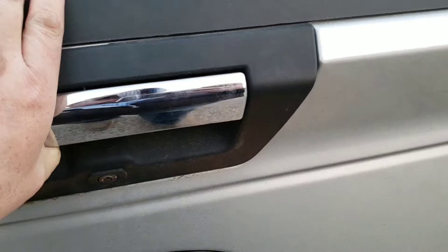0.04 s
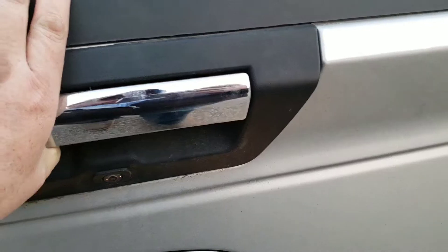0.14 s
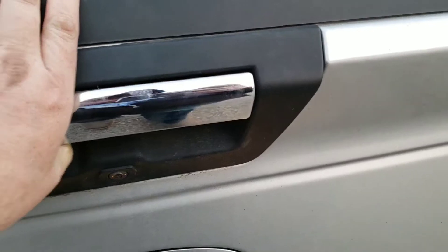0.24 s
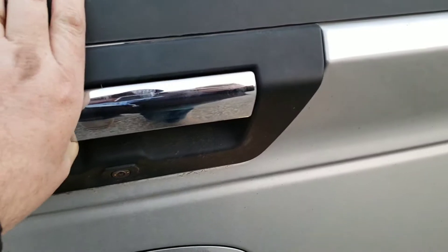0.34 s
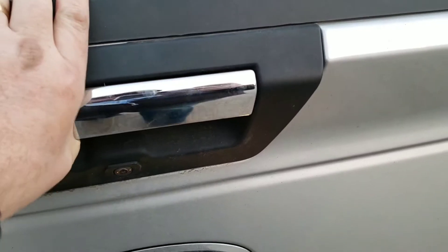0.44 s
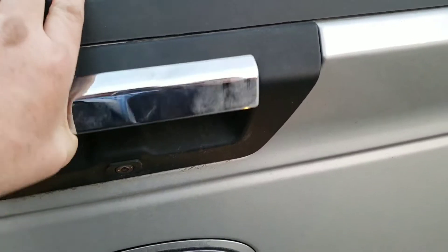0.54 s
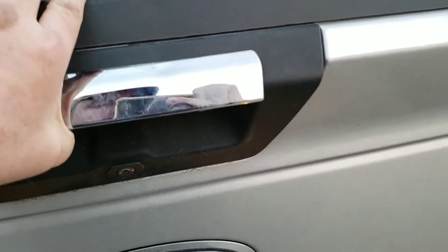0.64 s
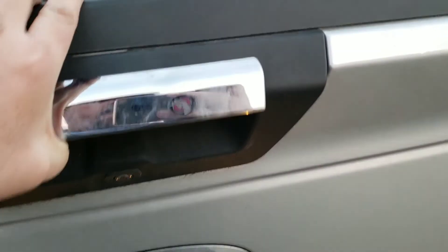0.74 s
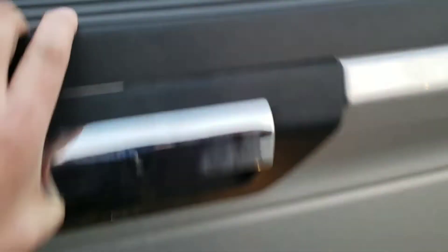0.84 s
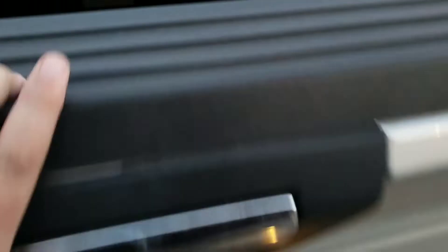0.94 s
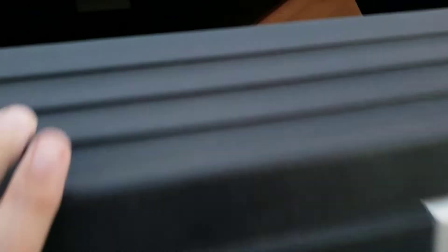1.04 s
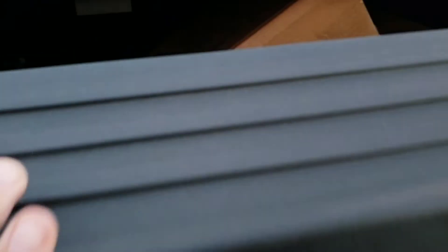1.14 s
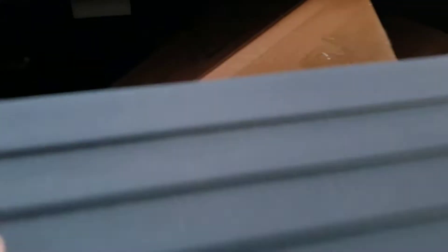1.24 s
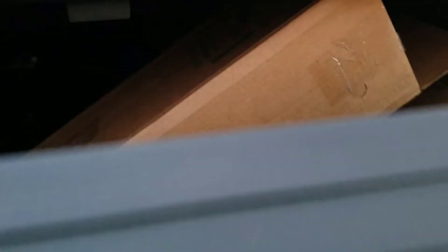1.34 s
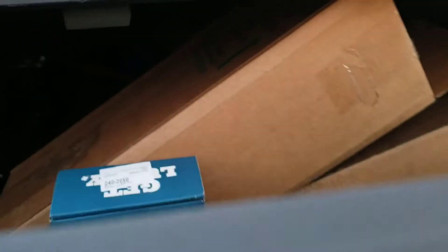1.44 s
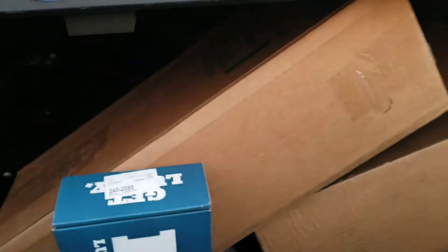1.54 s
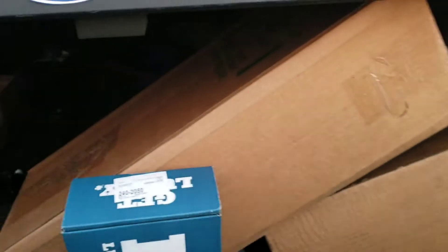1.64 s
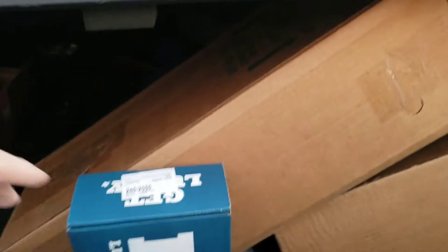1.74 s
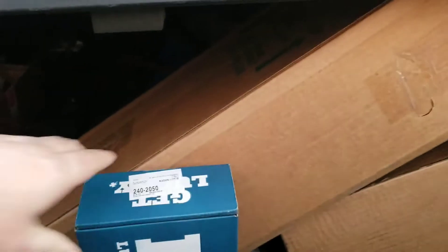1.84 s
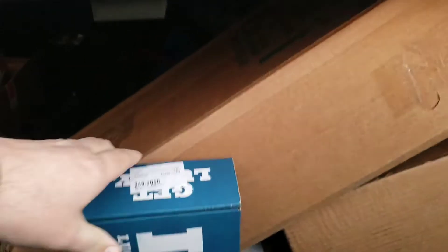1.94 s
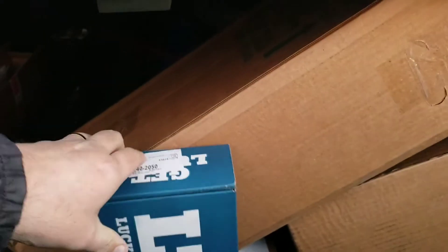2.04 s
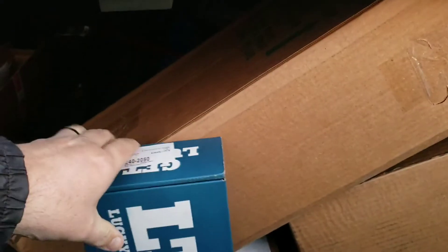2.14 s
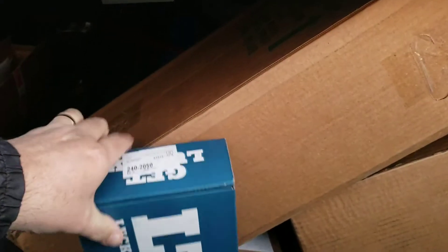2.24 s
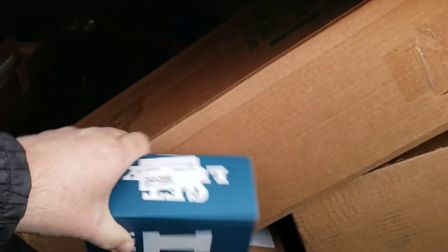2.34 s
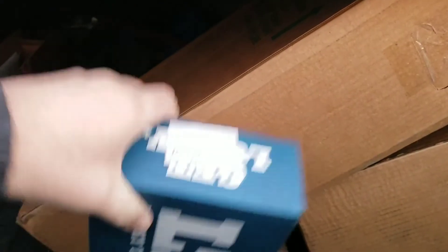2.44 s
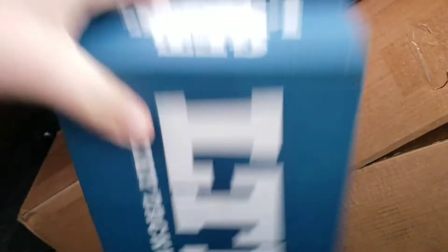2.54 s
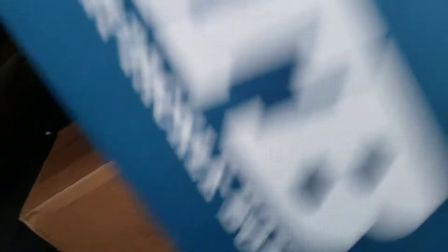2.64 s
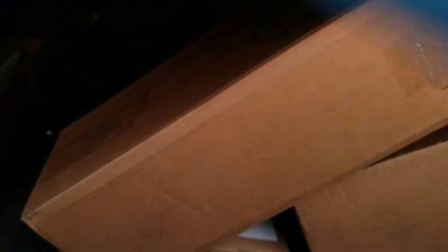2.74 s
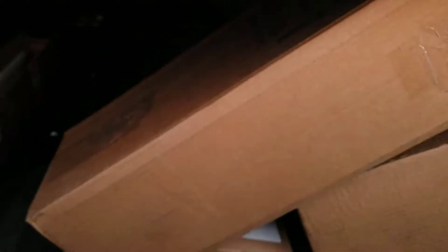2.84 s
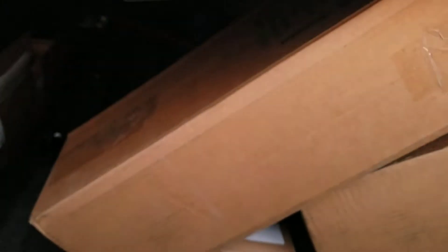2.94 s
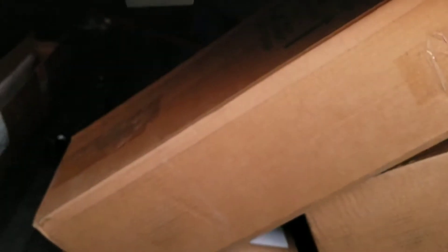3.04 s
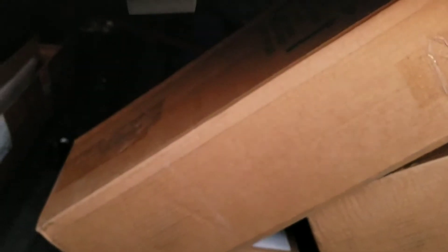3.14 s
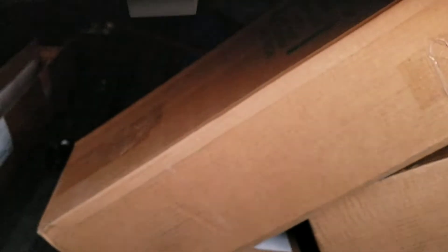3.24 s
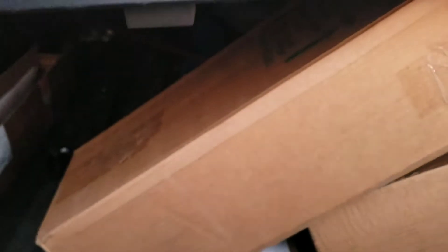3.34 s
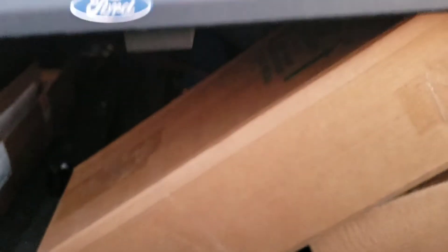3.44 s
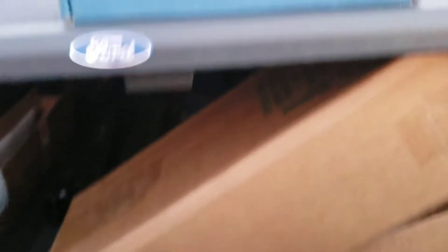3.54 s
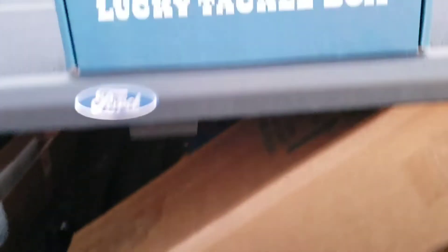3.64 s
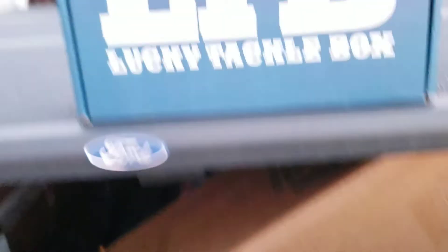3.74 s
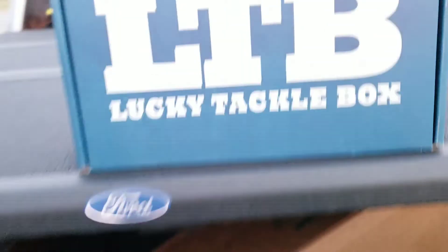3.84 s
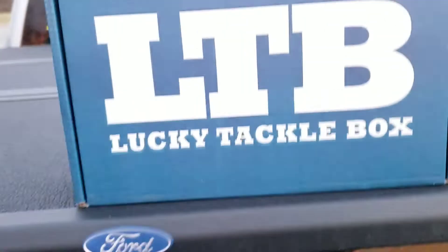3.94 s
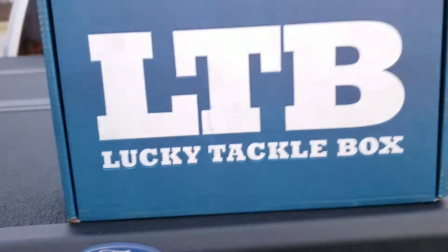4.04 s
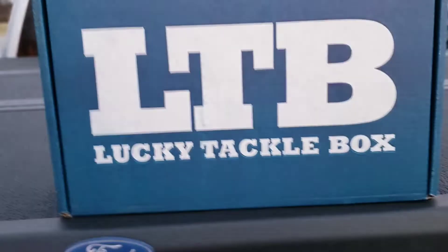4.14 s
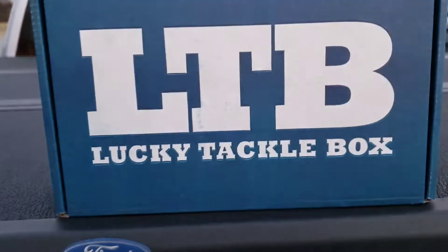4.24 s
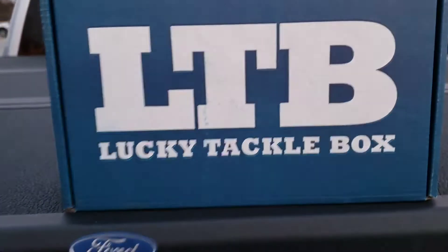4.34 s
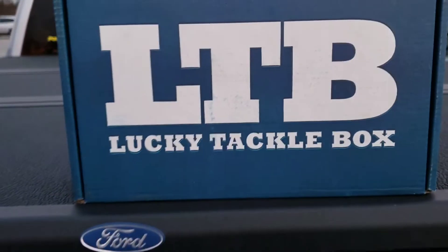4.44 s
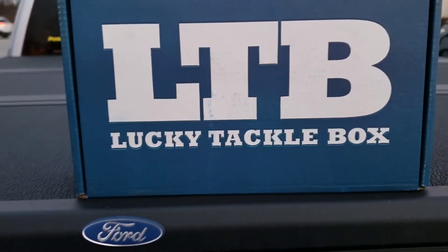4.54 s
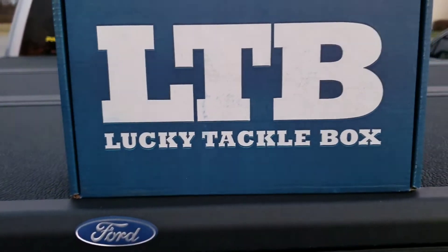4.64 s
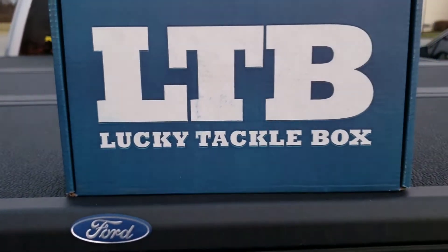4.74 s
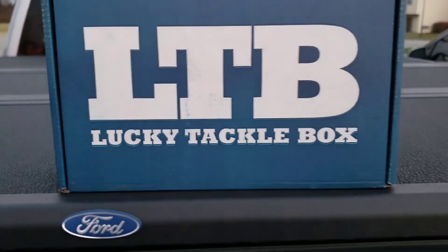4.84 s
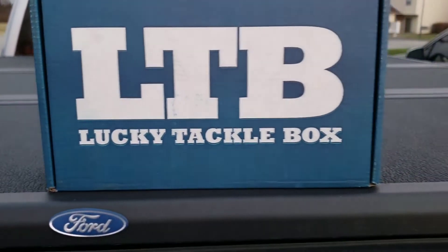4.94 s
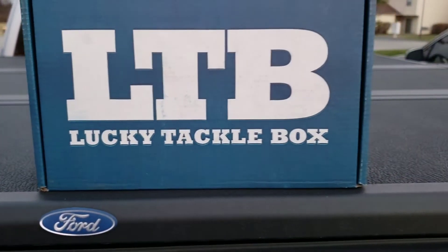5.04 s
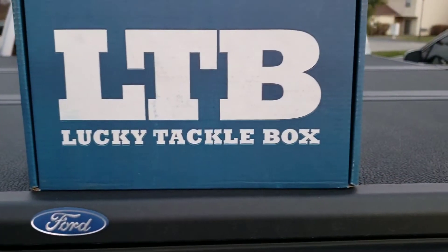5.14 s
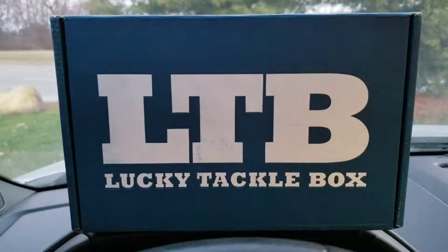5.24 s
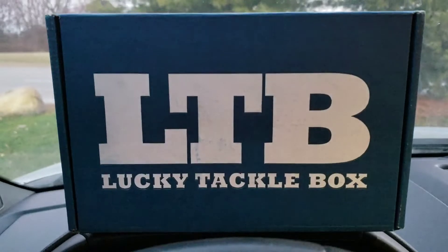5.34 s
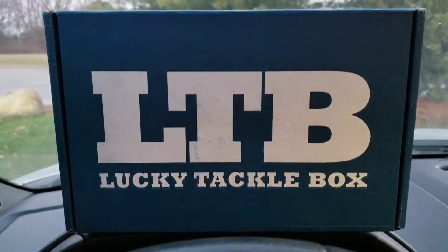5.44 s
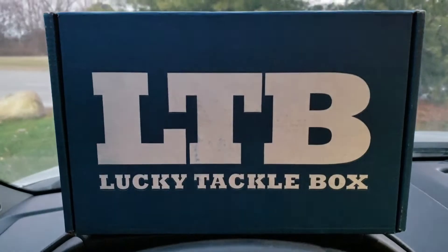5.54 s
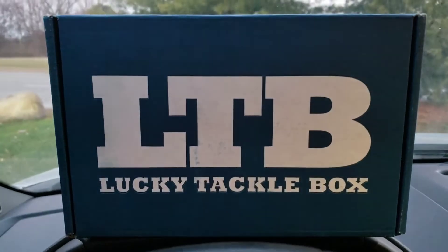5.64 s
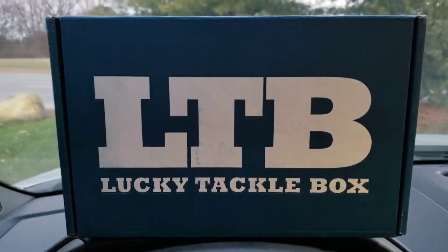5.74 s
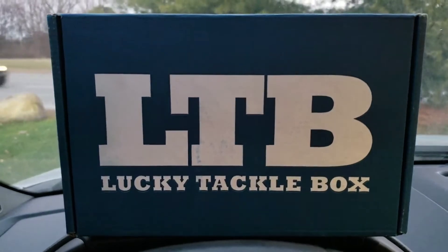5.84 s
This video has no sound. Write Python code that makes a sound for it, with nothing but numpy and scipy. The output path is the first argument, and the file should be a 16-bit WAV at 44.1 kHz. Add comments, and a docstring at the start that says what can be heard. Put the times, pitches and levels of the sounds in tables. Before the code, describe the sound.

A low, slightly wavering engine idle, with rumble and a soft airy whirr, fades in during the first quarter second and continues throughout. Close and slightly left, a plastic handle knocks at about 0.53 to 0.61 s, with little linkage ticks, then squeaks dry and high around 0.65 to 0.75 s; a dull thump follows at 0.88. At 0.96 the latch springs open with a bright clack and short metallic ring. From 1.2 to 3.3 s a nylon sleeve hisses in uneven swishes while hands rub cardboard, fingertips patter near 1.7 and faint creaks scatter. Hollow box knocks cluster at 3.0 to 3.13. At 3.74 the box is set down with a short clack. A faint rising hinge squeak at 3.94 leads to the slam at 4.2 to 4.3: rapid latch clicks, a heavy bassy thud and brief rattle. Then quiet idling, swelling toward the end near 5.9, with barely audible cloth movement.

```python
"""Loading a box into an idling pickup

Close by, slightly left, a plastic handle knocks and squeaks, a latch springs open and at last the door slams.
A jacket sleeve hisses; a cardboard box knocks, creaks, is rubbed and tapped, and is set on the bed cover.
Blows ring decaying sine modes and noise bands; squeaks are jittered tones; rubs and cloth are shaped noise.
Behind it all the engine idles: firing-rate orders, a fan tone, rumble and a resonant whirr.
"""
import sys
import numpy as np
from scipy import signal
from scipy.io import wavfile

SR = 44100
rng = np.random.default_rng(int(sys.argv[2]) if len(sys.argv) > 2 else 0)


def transcribe(u):
    """Save the signal u as a 16-bit wav file named by the first command-line argument.

    u: samples, shape (n,) or (channels, n), limited to [-1, 1]; the rate is SR.
    q: integer samples, one column per channel.
    """
    v = np.clip(np.atleast_2d(u).T, -1, 1)
    q = np.round(v * 32767).astype(np.int16)
    wavfile.write(sys.argv[1], SR, q)


N = 260190
TIME = np.arange(N) / SR
# Half-octave noise bands: edges and centres in Hz
BAND_EDGES = 22 * 2 ** (np.arange(20) / 2)
BAND_HZ = np.sqrt(BAND_EDGES[1:] * BAND_EDGES[:-1])


def from_db(db):
    """Decibels to gain."""
    return 10 ** (np.asarray(db) / 20)


def rms_one(x):
    """Scale to unit power."""
    return x / np.sqrt(np.mean(x ** 2) + 1e-20)


def in_time(rows):
    """Each column of a curve at every sample."""
    s, *columns = np.transpose(rows)
    return [np.interp(TIME, s, column) for column in columns]


def at_hz(points, hz, axis=1):
    """Read one column of a spectrum on a log-frequency axis."""
    points = np.array(points)
    return np.interp(np.log(hz), np.log(points[:, 0]), points[:, axis])


def drift(rate):
    """Smooth chance with spread 1 that takes a new value `rate` times a second."""
    return rms_one(np.interp(TIME * rate, np.arange(N), rng.standard_normal(N)))


def pan(x, left_db):
    """Tip a sound towards the left by a level difference."""
    return x * from_db([[left_db / 2], [-left_db / 2]])


def swell(start, length, attack_s, release_s):
    """A movement builds up, holds to the end of its length and dies away."""
    age = TIME - start
    return np.clip(age / attack_s, 0, 1) * np.exp(-np.clip((age - length) / release_s, 0, 20))


def noise_bands():
    """Half-octave bands of stereo noise, rms 1 each; sound from all sides is alike at both ports only in the bass."""
    port_spacing_m, sound_speed = 0.15, 343  # m, m/s
    white = rng.standard_normal((2, 2, N))
    bands = []
    for k, hz in enumerate(BAND_HZ):
        band_pass = signal.butter(2, BAND_EDGES[k:k + 2], "band", fs=SR, output="sos")
        mid, side = signal.sosfilt(band_pass, white[k % 2])
        alike = 0.96 * np.sinc(2 * hz * port_spacing_m / sound_speed)
        stereo = np.sqrt(1 + alike) * mid + np.sqrt(1 - alike) * side * [[1], [-1]]
        bands.append(rms_one(stereo).astype(np.float32))
    return np.array(bands)


def coloured(bands, spectrum):
    """Steady noise of a given spectrum, rms 1."""
    # a band's power grows with its width, hence the root of its frequency
    gains = from_db(at_hz(spectrum, BAND_HZ)) * np.sqrt(BAND_HZ)
    return rms_one(np.tensordot(gains.astype(np.float32), bands, axes=1))


def resonate(x, hz, width_hz, gain):
    """Lift one resonance out of a sound."""
    return x + gain * signal.lfilter(*signal.iirpeak(hz, hz / width_hz, fs=SR), x)


def squeak(hz, gain, jitter, overtone_db, broken_db):
    """Stick-slip: a tone whose slips come unevenly in time and strength and break off, reaching the right side first."""
    phase = 2 * np.pi * np.cumsum(hz * (1 + jitter * drift(1500))) / SR
    tone = from_db(broken_db * drift(70)) * np.sin(phase)
    for k in (2, 3):
        tone = tone + from_db(overtone_db + broken_db * drift(70)) * np.sin(k * phase)
    tone = rms_one(tone * from_db(3 * drift(600))) * gain
    left = np.interp(TIME - 0.0003, TIME, tone)
    return np.array([left, tone])


def struck(bands, blows, modes, thicket, right_lead_ms, crack_db, echo_db, echo_t60, crack_t60=0.0079):
    """Each blow cracks, then rings a thing's strong modes and its thicket of weak ones; the truck's hollows echo."""
    # Where the four columns of a blow apply: thump_hz, clack_hz, snap_hz, steel_hz
    blow_hz = (200, 1000, 4000, 12000)
    out, t = np.zeros((2, N)), TIME[:SR // 2]
    ringing = from_db(-60 * t / at_hz(thicket, BAND_HZ, axis=2)[:, None])
    crack = from_db(crack_db - 60 * t / crack_t60) * (BAND_HZ > blow_hz[1])[:, None]
    echo = from_db(echo_db - 60 * t / echo_t60)
    onset = 1 - np.exp(-2 * t * BAND_HZ[:, None])
    decay = np.hypot(ringing + crack, echo) * onset
    # the left port hears the modes later, the right port earlier
    age = np.maximum(t - np.array([[right_lead_ms], [-right_lead_ms]]) / 2000, 0)
    for s, *colour_db in blows:
        force = list(zip(blow_hz, colour_db))
        first = round(s * SR)
        span = slice(first, first + len(t))
        gains = from_db(at_hz(force, BAND_HZ) + at_hz(thicket, BAND_HZ))
        out[:, span] += np.einsum("bt,bct->ct", gains[:, None] * decay, bands[:, :, span])
        for k, (hz, db, t60) in enumerate(modes):
            # neighbouring modes start in opposite directions, so close pairs swell before they fade
            level = from_db(at_hz(force, hz) + db - 60 * age / t60)
            out[:, span] += (-1) ** k * level * np.sin(2 * np.pi * hz * age)
    return out


def rebounds(s, blow, count, gap_s, loss_db, dulling_db):
    """A blow repeats, each time weaker and, above the thump, duller."""
    thump_db, *upper_db = blow
    run = []
    for k in range(count):
        upper = np.array(upper_db) - k * (loss_db + dulling_db)
        run.append((s + k * gap_s, thump_db - k * loss_db, *upper))
    return run


def chatter(span_s, tick, count, spread_db):
    """Ticks of uneven strength, scattered over a stretch of time."""
    times = rng.uniform(*span_s, count)
    changes_db = spread_db * rng.uniform(-0.83, 1, count)
    return [(s, *(np.array(tick) + db)) for s, db in zip(times, changes_db)]


def engine(bands, hum_db=-3.0, rumble_db=-2, whirr_db=2.5, waver_db=3.0):
    """Exhaust orders and a fan tone, each wavering a little, over rumble and the hollow whirr of the engine bay."""
    # Mean idle speed: time_s, firing_hz
    idle = [(.2, 32.3), (3.0, 31.3), (4.0, 30.4), (4.8, 31.2), (5.9, 31.8)]
    # Loudness of exhaust and bay whirr, rising and falling, before trims: time_s, exhaust_db, bay_whirr_db
    # (the whirr's rise near 0.77 s includes handle friction)
    loudness = [(0.3, -34.5, -46.5), (0.39, -34.5, -46), (0.77, -31, -41), (1.22, -36.5, -48),
                (1.61, -37, -50), (2.92, -33, -46.5), (3.28, -35, -50.5), (3.72, -40.5, -51),
                (4.21, -36.5, -48.5), (4.42, -42, -54), (4.89, -45.5, -57), (5.38, -41.5, -53),
                (5.68, -35, -45.5), (5.9, -32.5, -47)]
    # Exhaust harmonics: multiple of the firing rate, relative_db
    orders = [(1, -28), (2, 3.5), (3, -2.5), (4, -8), (5, -12.5), (6, -1.5), (7, -19), (8, -0.5), (9, -7),
              (10, -18), (11, -1), (12, -5.5), (13, -7.5)]
    # Spectrum of the low rumble: frequency_hz, relative_db_per_hz
    rumble_colour = [(22, -48), (33, -9), (48, 10), (80, 8.5), (130, 4.5), (200, 2.5), (380, -7),
                     (500, -37.5), (800, -44.5)]
    # Spectrum of the bay's whirr before its two resonances: frequency_hz, relative_db_per_hz
    whirr_colour = [(300, -29), (520, -1), (800, -0.5), (1200, -3), (2400, -9), (3300, -16.5),
                    (4700, -25.5), (6500, -46.5), (14000, -51.5)]
    (firing_hz,), (exhaust_db, bay_db) = in_time(idle), in_time(loudness)
    turn = 2 * np.pi * np.cumsum(firing_hz * (1 + 0.004 * drift(8))) / SR
    hum = 0
    for k, db in orders:
        level = from_db(db + waver_db * drift(7))
        hum = hum + level * np.sin(k * turn + rng.uniform(0, 2 * np.pi))
    fan_hz = 103.4 * (1 + 0.0207 * drift(9.7))
    fan_tone = rms_one(np.sin(2 * np.pi * np.cumsum(fan_hz) / SR))
    fan = from_db(-7 + waver_db * drift(5.24)) * fan_tone
    low = from_db(hum_db) * rms_one(hum) + fan + from_db(rumble_db) * coloured(bands, rumble_colour)
    whirr = resonate(coloured(bands, whirr_colour), hz=761, width_hz=185, gain=1.0)
    whirr = rms_one(resonate(whirr, hz=2266, width_hz=500, gain=0.082))
    exhaust = pan(from_db(exhaust_db) * low, left_db=2.5)
    return exhaust + pan(from_db(bay_db + whirr_db) * whirr, left_db=0.5)


def sleeve(bands, trim_db=4, grain_db=0.2, uneven_db=1.0):
    """Nylon slides on nylon while the arm moves: a fine hiss that catches unevenly."""
    # Moves of the arm: start_s, length_s, level_db (before the trim)
    arm_moves = [(0.546, 0.4, -59), (1.235, 0.42, -57), (1.57, .3, -52.5), (2.16, 0.15, -58.5),
                 (2.32, 0.81, -57.5), (3.31, 0.34, -60.5), (4.14, .15, -68), (5.284, .25, -72)]
    # Cloth spectrum: frequency_hz, relative_db_per_hz
    cloth_colour = [(800, -5), (2000, 3.5), (4000, 5), (7000, -5.5), (10000, 2.5), (13000, -1), (16000, -3)]
    power = 0
    for start, length, db in arm_moves:
        power = power + (from_db(db) * swell(start, length, attack_s=0.058, release_s=0.13)) ** 2
    catching = from_db(trim_db + grain_db * drift(250) + uneven_db * drift(18))
    return np.sqrt(power) * catching * coloured(bands, cloth_colour)


def rubs(bands, grain_db=4.5, slope_db=9):
    """Hands and box rub over plastic and cardboard: fibres catch and let go in a broad peak of noise, dB per octave."""
    # Strokes: middle_s, half_length_s (at half height), level_db (before swell and grain), centre_hz
    strokes = [(0.539, 0.015, -43, 5900), (0.733, 0.031, -39, 820), (1.587, 0.027, -42, 3530),
               (1.69, 0.026, -41.5, 1400), (1.81, 0.089, -45.5, 1870), (2.055, 0.019, -45.5, 850),
               (2.313, 0.0081, -44.5, 11000), (2.41, 0.029, -49.5, 4330), (2.455, 0.084, -43, 876),
               (2.773, 0.01, -36, 12300), (2.78, 0.039, -49, 764), (2.979, .025, -41.5, 850),
               (3.018, 0.0094, -29.5, 850), (5.085, .018, -65.5, 11500)]
    out = np.zeros((2, N))
    grains = rms_one(from_db(grain_db * drift(500)))
    for s, half, db, hz in strokes:
        span = slice(int((s - 2 * half) * SR), int((s + 2 * half) * SR))
        gains = from_db(-slope_db * np.abs(np.log2(BAND_HZ / hz)))
        hiss = rms_one(np.tensordot(gains, bands[:, :, span], axes=1))
        out[:, span] += from_db(db) * hiss * grains[span] * np.hanning(hiss.shape[1])
    return out


def hinge(start_s=3.935, rise_hz_per_s=2100):
    """One faint, broken stick-slip squeak, rising as the swinging door gathers speed."""
    # The squeak: length_s, starting_pitch_hz, level_db
    swing = (.09, 1410, -54)
    length, hz, db = swing
    rise = rise_hz_per_s * np.clip(TIME - start_s, 0, 2 * length)
    gain = from_db(db) * swell(start_s, length, attack_s=0.04, release_s=0.043)
    return squeak(hz + rise, gain, jitter=0.018, overtone_db=-1.5, broken_db=8.5)


def handle_pivot(trim_db=1, sag_hz_per_s=9000):
    """A dry pivot squeaks in short slips; each starts sharp and sags in pitch as the pivot gives way."""
    # Slips: start_s, length_s, middle_pitch_hz, level_db (before the trim), pitch_jitter_share
    slips = [(.645, .036, 4450, -45.5, .04), (0.679, .013, 4020, -23.5, .025),
             (0.7, 0.018, 4340, -27.5, 0.066), (0.705, .018, 4900, -32, .06),
             (0.723, 0.016, 4020, -34, 0.041), (0.739, .005, 4300, -25.5, .04)]
    out = 0
    for start, length, hz, db, jitter in slips:
        sag = sag_hz_per_s * np.clip(TIME - start - length / 2, -length, length)
        gain = from_db(db + trim_db) * swell(start, length, attack_s=0.0044, release_s=0.0043)
        out = out + squeak(hz - sag, gain, jitter, overtone_db=-24, broken_db=2)
    return out


def handle(bands):
    """Pulled plastic knocks and rings briefly, with small ticks from play in its linkage."""
    # Blows: start_s, thump_db (200 Hz), clack_db (1 kHz), snap_db (4 kHz), steel_db (12 kHz)
    blows = [(0.526, -23.5, -36, -38.5, -56), (0.5756, -38, -42, -47, -33),
             (0.5833, -24.5, -22.5, -28, -49), (0.6144, -20.5, -47, -69, -58),
             (0.691, -18.5, -25, -43.5, -36), (0.7424, -28, -37, -40, -41), (.8815, -15, -47, -37, -38.5)]
    # Strong modes: pitch_hz, relative_db, t60_s
    modes = [(128.7, 0.5, 0.14), (224, -1, 0.041), (303, -3.5, 0.075), (773, -12, 0.073),
             (1074, 0.5, 0.056), (4330, -8, 0.029)]
    # Weak modes between them: frequency_hz, relative_db_per_half_octave, t60_s
    thicket = [(60, -12, 0.075), (253, -5.5, 0.072), (535, -13.5, 0.11), (1050, -6.5, 0.1),
               (2130, -13.5, 0.062), (3640, 0, 0.045), (7460, -6.5, 0.059), (13000, -8.5, 0.072)]
    # Linkage tick before its random change: thump_db, clack_db, snap_db, steel_db
    tick = (-36, -46, -46.5, -50)
    linkage = chatter((0.53, 0.77), tick, count=12, spread_db=4.5)
    return struck(bands, [*blows, *linkage], modes, thicket, right_lead_ms=0.16,
                  crack_db=3.0, echo_db=-12, echo_t60=0.17)


def latch(bands):
    """The latch springs open, and its blows ring the door."""
    # Blows: start_s, thump_db (200 Hz), clack_db (1 kHz), snap_db (4 kHz), steel_db (12 kHz)
    blows = [(0.959, -46, -41, -31.5, -22), (0.9644, -24.5, -11.5, -23.5, -22.5),
             (0.9719, -10.5, -28, -43, -39), (1.054, -32, -64, -50, -44)]
    # Strong modes of the door: pitch_hz, relative_db, t60_s
    modes = [(151, -3, 0.17), (260.3, 9, 0.18), (296, 0.5, 0.19), (426, 1, 0.12), (640, -20, 0.15),
             (968, 2, 0.025), (1150, -2.5, 0.087), (1320, 5, 0.025), (1663, -24, 0.03), (3370, -2, 0.11),
             (4340, -17, 0.077)]
    # Weak modes between them: frequency_hz, relative_db_per_half_octave, t60_s
    thicket = [(60, -21, 0.31), (258, -5.5, 0.2), (550, -8, 0.15), (1210, -2.5, 0.041), (1900, -19, 0.21),
               (4330, -2, 0.091), (7200, -13.5, 0.11), (12900, -9, 0.1)]
    return struck(bands, blows, modes, thicket, right_lead_ms=0.084,
                  crack_db=-10, echo_db=-20.5, echo_t60=0.33)


def box(bands):
    """Hollow cardboard knocks against the truck, creaks in the grip and rings under pattering fingertips."""
    # Blows: start_s, thump_db (200 Hz), clack_db (1 kHz), snap_db (4 kHz), steel_db (12 kHz)
    blows = [(1.6602, -36.5, -30.5, -41, -28), (2.2854, -23.5, -51, -48, -69),
             (3.0060, -30, -27.5, -54, -48), (3.0305, -8.5, -13, -24, -34),
             (3.0493, -30, -18.5, -24.5, -39.5), (3.0580, -14, -49, -44, -53),
             (3.1260, -36, -35.5, -42, -58)]
    # Strong modes: pitch_hz, relative_db, t60_s
    modes = [(117, -5.5, 0.18), (159.6, -3.5, 0.15), (245.3, -10.5, 0.25), (319, 0, 0.09), (659, 4, 0.065),
             (766, 0, 0.044), (885, 1.5, 0.044), (1039, -5, 0.08), (1423, -7, 0.065), (1987, -6, 0.075),
             (2136, 0.5, 0.026), (2570, -7, 0.049), (3170, -9, 0.069), (3720, -14, 0.039)]
    # Weak modes between them: frequency_hz, relative_db_per_half_octave, t60_s
    thicket = [(61, -26.5, 0.072), (251, -1.5, 0.15), (473, -12, 0.04), (800, -7.5, 0.073),
               (2000, -8, 0.044), (3670, -6.5, 0.064), (6560, -14.5, 0.15), (12400, -3.5, 0.053)]
    # First fingertip tap: thump_db, clack_db, snap_db, steel_db
    tap = (-56, -51, -47, -41)
    # Cardboard creak before its random change: thump_db, clack_db, snap_db, steel_db
    creak = (-62, -46.5, -54, -58.5)
    patter = rebounds(1.7135, tap, count=4, gap_s=0.019, loss_db=4.0, dulling_db=2.0)
    creaks = chatter((1.67, 2.95), creak, count=22, spread_db=5.5)
    return struck(bands, [*blows, *patter, *creaks], modes, thicket, right_lead_ms=0.066,
                  crack_db=7.5, echo_db=-16, echo_t60=0.31)


def bed_cover(bands):
    """The box is set down, and the bed cover rings shortly."""
    # Blow: start_s, thump_db (200 Hz), clack_db (1 kHz), snap_db (4 kHz), steel_db (12 kHz)
    blows = [(3.7405, -29.5, -26.5, -30.5, -50)]
    # Strong modes: pitch_hz, relative_db, t60_s
    modes = [(492, -5, 0.066), (970, 2.5, 0.035), (1147, 5.5, 0.041), (2280, -1, 0.032), (3430, 2.5, 0.013),
             (3970, 2, 0.01), (4660, -2, .025)]
    # Weak modes between them: frequency_hz, relative_db_per_half_octave, t60_s
    thicket = [(100, -10, 0.15), (1000, -2.5, 0.068), (4200, -18, 0.021), (6000, -18, .03),
               (13000, -4, .04)]
    return struck(bands, blows, modes, thicket, right_lead_ms=0.28,
                  crack_db=-4, echo_db=-13.5, echo_t60=0.28)


def air_push(s, width_s, peak_db):
    """The closing door squeezes the air behind its seal: one smooth pressure bump, in step at both sides."""
    return from_db(peak_db) * np.exp(-((TIME - s) / width_s) ** 2)


def slam(bands):
    """The door meets the striker, the latch snaps over it in two stages, and the door lands on its seal."""
    # Blows: start_s, thump_db (200 Hz), clack_db (1 kHz), snap_db (4 kHz), steel_db (12 kHz)
    blows = [(4.1987, -14.5, -27, -31, -39), (4.204, -31.5, -19.5, -35.5, -46.5),
             (4.2082, -17.5, -32, -29.5, -32.5), (4.2125, -29, -19.5, -22.5, -26.5),
             (4.234, -32.5, -39.5, -34.5, -16), (4.2707, -33.5, -41, -42.5, -36.5),
             (4.3090, -30.5, -38, -48.5, -65)]
    # Strong modes of the body: pitch_hz, relative_db, t60_s
    modes = [(52.2, 6, 0.067), (90, 3, 0.074), (120, -1, 0.095), (159, -4.5, 0.23), (226, -2.5, 0.081),
             (286, -1, 0.088), (421, -12, .16), (632, -11, .14), (807, -4, 0.04), (986, -2, 0.077)]
    # Weak modes between them: frequency_hz, relative_db_per_half_octave, t60_s
    thicket = [(30.09, -13, 0.15), (250, -13.5, 0.21), (550, -9.5, 0.13), (887, -10, 0.13),
               (1686, -11.5, 0.11), (3770, -1.5, 0.087), (7430, -6.5, 0.056), (13100, -4, 0.076)]
    # First landing on the seal: thump_db, clack_db, snap_db, steel_db
    seal_blow = (-12, -28, -29, -35.5)
    landing = rebounds(4.241, seal_blow, count=4, gap_s=0.0107, loss_db=5.0, dulling_db=1.7)
    body = struck(bands, [*blows, *landing], modes, thicket, right_lead_ms=0.055,
                  crack_db=5, echo_db=-27, echo_t60=0.24)
    return body + air_push(s=4.247, width_s=0.0036, peak_db=-7.0)


def scene():
    """Handle, latch, box and slam over the idling engine."""
    steady, ringing = noise_bands(), noise_bands()
    background = engine(steady) + sleeve(steady)
    friction = rubs(ringing) + hinge() + handle_pivot()
    blows = handle(ringing) + latch(ringing) + box(ringing) + bed_cover(ringing) + slam(ringing)
    return background + friction + pan(blows, left_db=2.0)


def record(dry, port_hz=12900, port_width_hz=1800, port_gain=1.13, low_cut_hz=42, top_cut_hz=15300):
    """The microphone loses the deepest bass and its right port rings in the treble; a fade-in and a top cut follow."""
    low_cut = signal.butter(2, low_cut_hz, "high", fs=SR, output="sos")
    left, right = signal.sosfilt(low_cut, dry)
    heard = np.array([left, resonate(right, port_hz, port_width_hz, port_gain)])
    fade_in = np.clip((TIME - 0.095) / 0.17, 0, 1)
    limited = np.clip(heard * fade_in, -1, 1)
    top_cut = signal.ellip(10, 0.1, 90, top_cut_hz, fs=SR, output="sos")
    return signal.sosfilt(top_cut, limited)


dry = scene()
out = record(dry)
transcribe(out)
```